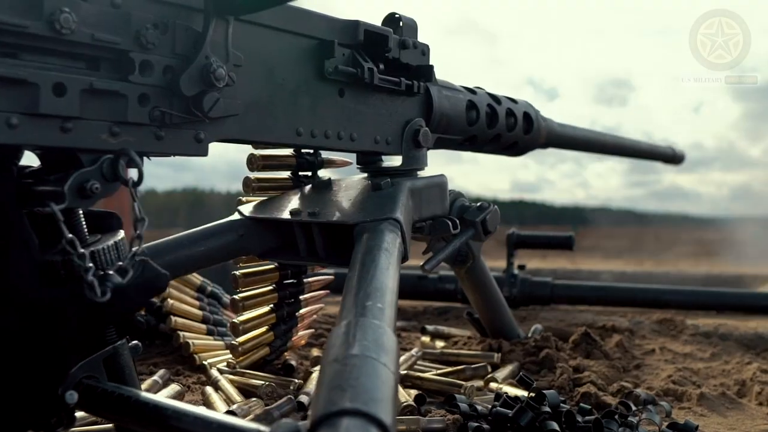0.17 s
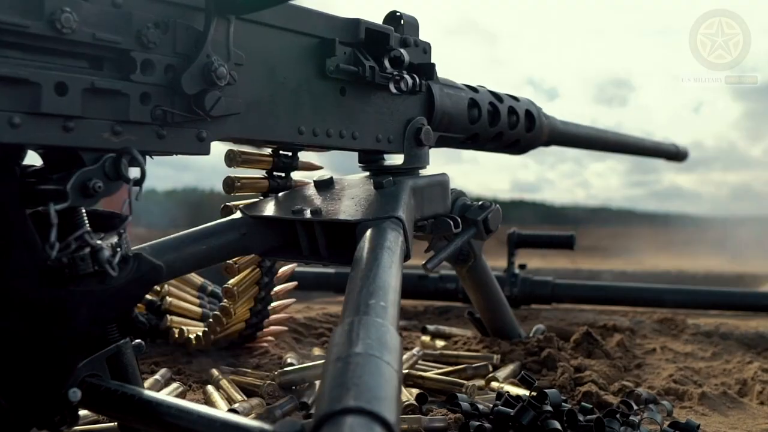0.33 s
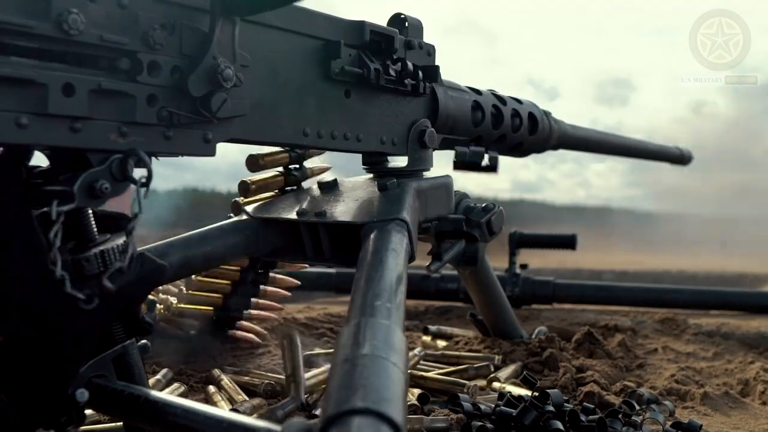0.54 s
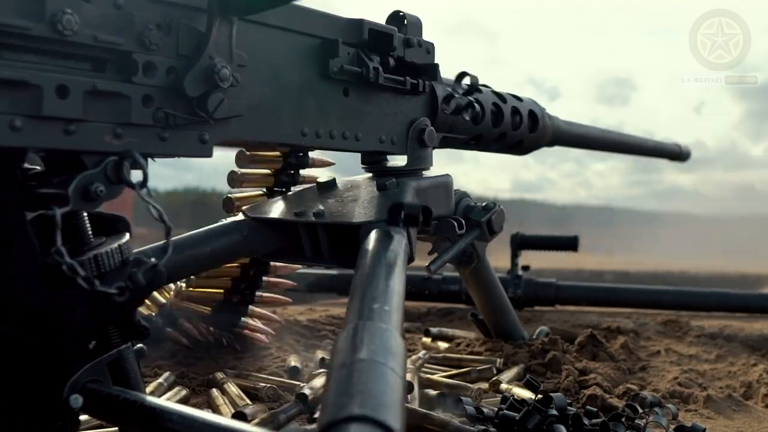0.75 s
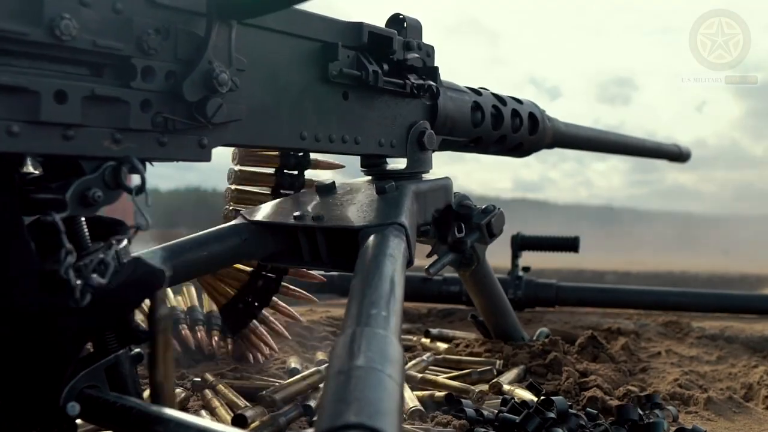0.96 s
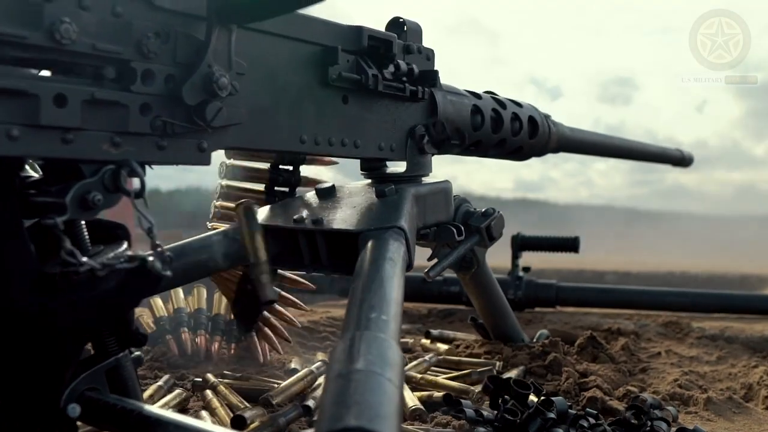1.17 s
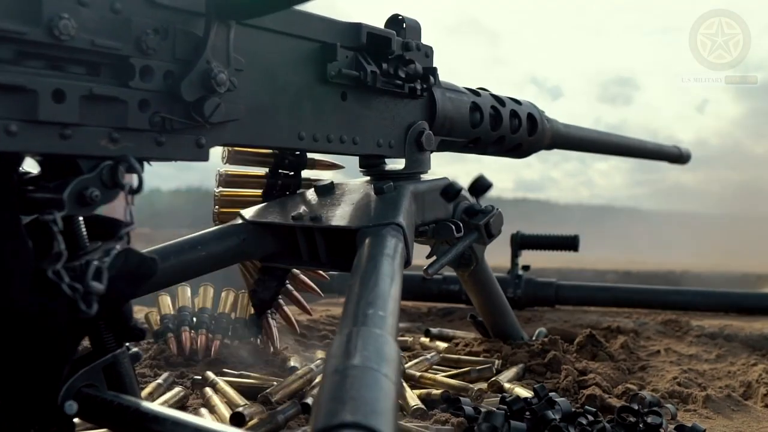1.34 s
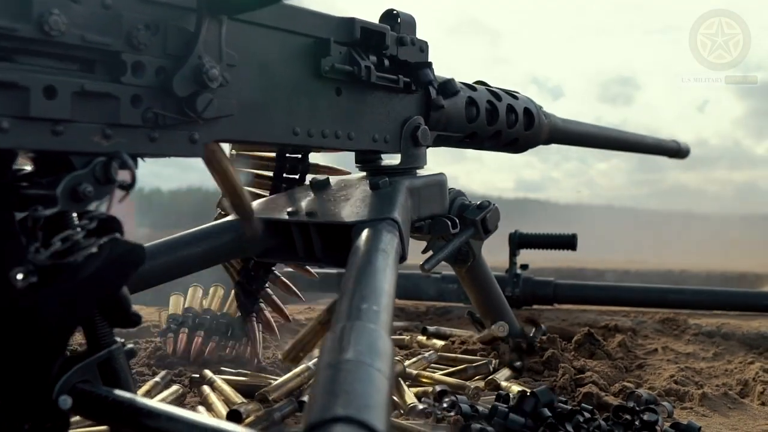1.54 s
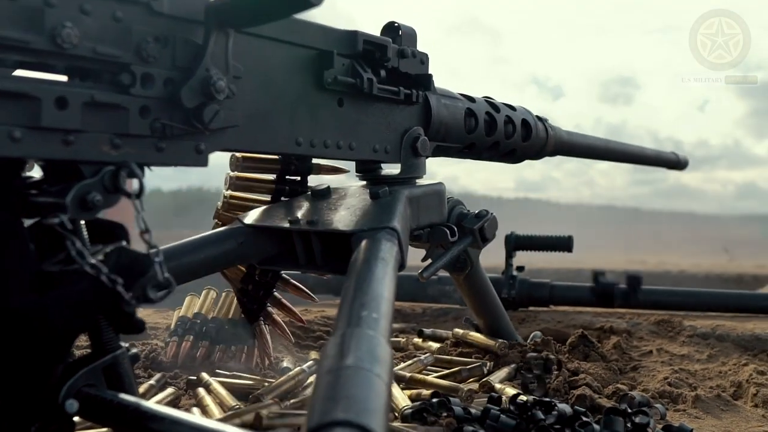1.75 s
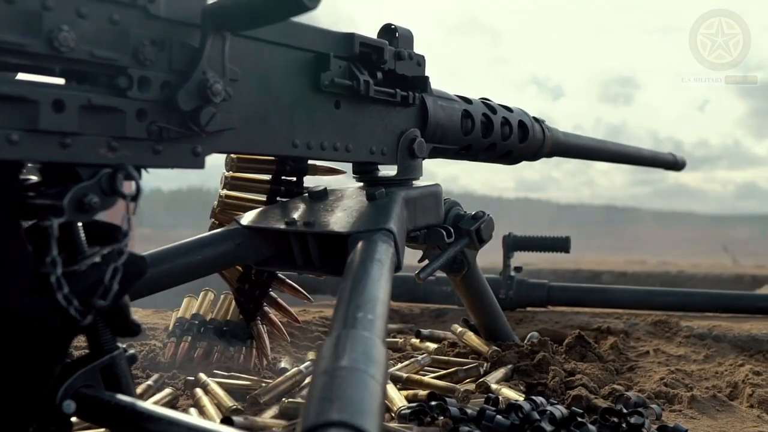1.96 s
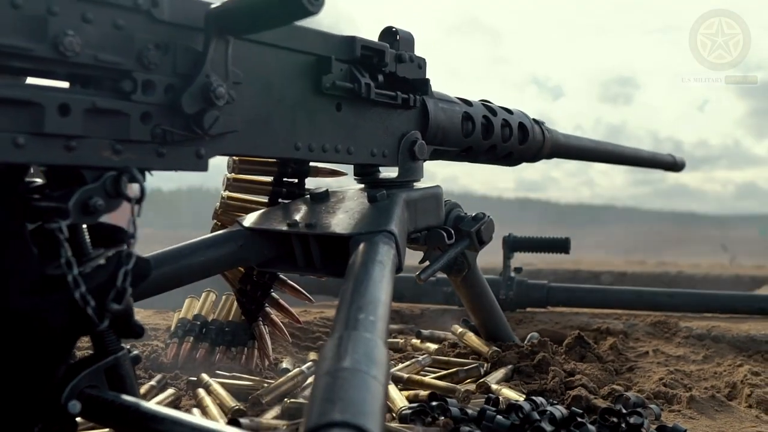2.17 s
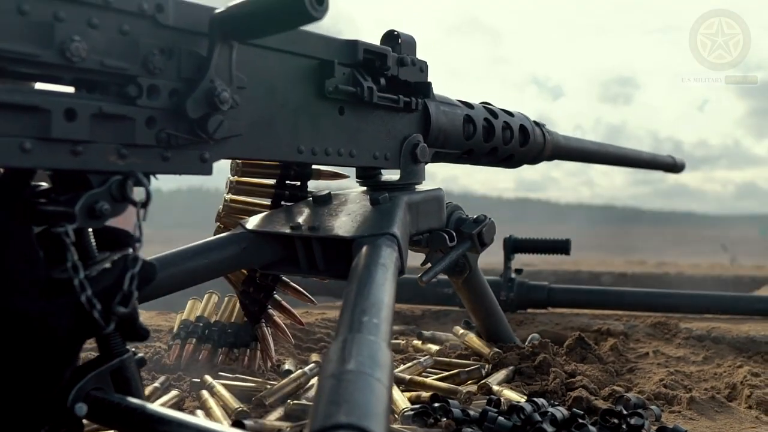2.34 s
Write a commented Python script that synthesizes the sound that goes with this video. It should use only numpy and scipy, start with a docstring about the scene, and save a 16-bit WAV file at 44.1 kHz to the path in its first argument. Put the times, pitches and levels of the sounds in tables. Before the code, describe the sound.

A heavy machine gun, close to the microphone outdoors, hammers out a single steady burst with clanking metal and clinking cases. The firing stops with an empty clack, jingling links and a sharp knock, and the echo dies away.

```python
"""A heavy machine gun on a tripod fires eleven rounds, close by, on an open range. Dull bumps on the gun come
first. Each cycle: the bolt slams shut, the blast tears and falls in pitch, a heavy thud follows and the mount
rings, the bolt hits its buffer and drags the belt on. Cases ring on the pile. The bolt shuts on an empty
chamber, links drop, a sharp knock sounds and the brass settles while the range echo dies away."""
import sys
import numpy as np
from scipy import signal
from scipy.fft import rfft, irfft
from scipy.io import wavfile
from scipy.ndimage import uniform_filter1d

SR = 44100
rng = np.random.default_rng(int(sys.argv[2]) if len(sys.argv) > 2 else 0)


def persist_wave(psi):
    """Save psi, clipped to +-1, as 16-bit WAV."""
    counts = np.round(np.clip(psi, -1, 1) * 32767).astype(np.int16)
    wavfile.write(sys.argv[1], SR, np.atleast_2d(counts).T)


N = 105840

# Firing cycles (bolt shut time [s], slam [dB], blast [dB], thud [dB], clack delay [s], rattle [dB])
ROUNDS = [(0.229, 1.5, 1, 2.5, 0.094, 1.5), (0.3583, 0.5, 0.5, 2, 0.092, 2), (0.4851, 1, 0.5, 2, .098, 1),
          (.615, -1.5, 0.5, 1, .099, 2.5), (0.7494, -3.5, 1, 0.5, 0.091, 1.5),
          (0.883, -0.5, -0.5, 0.5, 0.098, 1), (1.0132, 1.5, -1, -0.5, 0.095, 0.5),
          (1.1426, 2, -1.5, -0.5, .0974, 1), (1.2701, 1, -0.5, 0, .0952, 0.5),
          (1.3955, 1, -0.5, -0.5, 0.11, 2), (1.543, 2, -1, -1, 0.094, -0.5)]
# Impacts (time [s], relative level [dB])
SOFT_KNOCKS = [(.001, -36.5), (.015, -33), (.118, -37.5), (.156, -44.5), (.214, -37)]
BRASS_TICKS = [(.057, -50), (.157, -49), (2.01, -45), (2.0723, -36), (2.095, -47), (2.218, -57),
               (2.274, -52.5), (2.32, -62)]
CASE_LANDINGS = [(.3, -7), (.425, -7), (.475, 4), (.552, 2.5), (.68, 3.5), (.72, -1), (.845, -1.5),
                 (.962, 3.5), (1.084, -2), (1.212, 2.5), (1.245, 0.5), (1.342, 3.5), (1.478, 1),
                 (1.605, -7), (1.648, -1), (1.708, -3.5), (1.748, -8.5), (1.788, -4.5)]
LINK_LANDINGS = [(1.69, 1.5), (1.785, 2), (1.86, -3), (1.921, -1), (1.943, -5)]
HARD_KNOCKS = [(1.8228, -18.5), (1.918, -36)]
# Noise spectra (frequency [Hz], relative density [dB])
AIR_SPECTRUM = [(30, -40), (70, -19), (120, -7.5), (220, -8.5), (320, -12.5), (630, -13), (1300, -3),
                (2300, -6.5), (3300, -19), (5500, -15.5), (9000, -29), (15000, -34)]
SOFT_KNOCK_SPECTRUM = [(30, -23), (140, 1), (300, -10.5), (700, -16.5), (1400, -11.5), (3000, -21.5),
                       (8000, -36.5), (15000, -53)]
TICK_SPECTRUM = [(200, -25), (2000, -2), (4000, -6.5), (6300, 6), (8500, -10.5), (10000, -9), (15000, -25)]
SLAM_SPECTRUM = [(60, -69), (300, -30), (700, -11), (1400, 3), (2400, -4), (4200, 0.5), (7000, -8.5),
                 (15000, -10)]
ECHO_SPECTRUM = [(40, -34), (150, -7), (300, -5), (600, -10), (1400, -3), (2400, -0.5), (3300, -6),
                 (6000, -8), (9000, -25), (15000, -30)]
BLAST_SPECTRUM = [(60, -30), (200, -20.5), (500, -5), (1200, -1), (2500, -0.5), (5000, -2), (8000, -3),
                  (15000, -5.5)]
THUD_SPECTRUM = [(40, -12), (90, -23), (140, -25), (350, 1.5), (700, -1), (1400, 1.5), (2200, -2.5),
                 (3200, -7.5), (6000, -2.5), (15000, -17)]
WASH_SPECTRUM = [(60, -25), (200, -6), (500, -4), (1400, 0), (2600, -1), (5000, -1), (8000, -5.5),
                 (15000, -11)]
BUFFER_SPECTRUM = [(60, -35), (130, -24), (250, -1), (700, -6.5), (1500, 0.5), (2800, -2.5), (5000, -7),
                   (15000, -30)]
RATTLE_SPECTRUM = [(60, -58), (400, -27.5), (800, -11.5), (1300, -2), (2500, 1), (4300, 1), (6000, 2.5),
                   (8000, -4.5), (15000, -5.5)]
HARD_KNOCK_SPECTRUM = [(40, -33), (100, -18), (230, 1.5), (600, -5.5), (1400, -3.5), (3000, -8),
                       (5500, -8.5), (8000, -16.5), (15000, -19)]
# Left-right likeness of noise (frequency [Hz], coherence [0-1])
COHERENCE = [(100, 0.99), (350, 1), (700, 0.64), (1400, 0.37), (4000, 0.18), (8000, 0), (15000, 0.06)]
# Modes of receiver and tripod, case, feed, link (frequency [Hz], relative level [dB], t60 [s])
MOUNT_MODES = [(113, -15.5, 0.33), (140.2, -5, .34), (230.5, 0.5, 0.27), (267, -3, .24), (358.3, 4, 0.15),
               (394, -7.5, 0.26), (501.3, -1, 0.17), (532, -3, .12), (642, 2, 0.1), (727.5, -2, 0.17),
               (948, -2.5, 0.19), (1039, -1, 0.14), (1269, -3, 0.089), (1353, 5, 0.071)]
CASE_MODES = [(4670, -9.5, 0.24), (6150, -10, 0.083), (6090, -9, 0.094), (6220, 0.5, 0.21), (6240, -3, .14),
              (6400, -5, 0.17), (8520, -9, 0.23), (9800, -13.5, .16), (11100, -11.5, 0.16),
              (14090, -14, 0.18)]
FEED_MODES = [(1786, -4.5, 0.17), (3520, -11, 0.18), (4110, 2, 0.15), (4260, -12.5, .1), (4570, -6, 0.21)]
LINK_MODES = [(6330, 0, 0.34), (7100, -12, 0.23), (7900, -8.5, 0.18), (8700, -8, 0.29), (9950, -0.5, .38),
              (9910, 2.5, 0.32), (10800, -5, .6), (11100, 0, .5), (11650, -3, .3), (11755, 2, .25),
              (12242, -3, 0.97), (12538, 0.5, .55), (12835, -2, .38), (14090, -4, .25), (14870, 4, 0.27),
              (14970, -3, 0.19)]

SHUT_S, SLAM_DB, BLAST_DB, THUD_DB, CLACK_DELAY_S, RATTLE_DB = np.transpose(ROUNDS)
CLACK_S = SHUT_S + CLACK_DELAY_S
PAWL_S = CLACK_S + 0.016
EMPTY_S, EMPTY_DB = 1.674, -2  # bolt shuts on an empty chamber
EVENT_T_S, SCENE_T_S = np.arange(12288) / SR, np.arange(N) / SR


def amp(db):
    """Decibels to gain."""
    return 10 ** (np.asarray(db) / 20)


def unit_rms(x):
    """Scales to unit rms."""
    return x / np.sqrt(np.mean(x ** 2) + 1e-20)


def lookup(points, hz):
    """Interpolates on a log-frequency axis."""
    points_hz, values = np.transpose(points)
    return np.interp(np.log(hz + 1), np.log(points_hz), values)


def pan(db):
    """Gains for a left-minus-right level."""
    return amp(np.array([[db], [-db]]) / 2)


def add(mix, start_s, sound):
    """Mixes a sound in at start_s."""
    part = mix[:, max(round(start_s * SR), 0):][:, :sound.shape[1]]
    part += sound[:, :part.shape[1]]


def low_cut(x, hz):
    """Removes rumble below hz."""
    return signal.sosfilt(signal.butter(3, hz, "high", fs=SR, output="sos"), x)


def wander(shape, samples):
    """Smoothed random curves of unit rms."""
    return unit_rms(uniform_filter1d(rng.standard_normal(shape), size=samples))


def noise(spectrum, grain_db=0, mono=1, size=len(EVENT_T_S)):
    """Coloured stereo noise in 1 ms grains; higher mono narrows it."""
    hz = np.fft.rfftfreq(size, 1 / SR)
    left, other = rfft(rng.standard_normal((2, size)) * amp(grain_db * wander(size, 44)))
    coherence = np.clip(lookup(COHERENCE, hz), 1e-4, 1) ** (1 / mono)
    right = coherence * left + np.sqrt(1 - coherence ** 2) * other
    return unit_rms(irfft(np.array([left, right]) * amp(lookup(spectrum, hz)), size))


def envelope(attack_s, hold_s, t60_s):
    """Linear rise, hold, exponential decay."""
    decay_s = np.maximum(EVENT_T_S - attack_s - hold_s, 0)
    return np.minimum(EVENT_T_S / attack_s, 1) * amp(-60 * decay_s / t60_s)


def bursts(times_s, levels_db, spectrum, shape, alike=0, grain_db=0, mono=1):
    """One noise burst per event; alike is the power share common to all."""
    out, common = np.zeros((2, N)), noise(spectrum, grain_db, mono)
    for start_s, db in zip(times_s, levels_db):
        fresh = noise(spectrum, grain_db, mono)
        add(out, start_s, amp(db) * shape * (np.sqrt(alike) * common + np.sqrt(1 - alike) * fresh))
    return out


def rings(times_s, levels_db, modes, attack_s, spread_rad, detune, vary_db, flutter=0):
    """Struck modes; spread_rad scatters left-right phase, flutter is the wobble of tumbling."""
    out, t = np.zeros((2, N)), np.arange(SR * 2 // 3) / SR
    hz, mode_db, t60_s = np.transpose(modes)[:, :, None]
    decay = amp(mode_db - 60 * t / t60_s) * np.minimum(t / attack_s, 1)
    start_rad = rng.uniform(0, 2 * np.pi, hz.shape)
    for start_s, db in zip(times_s, levels_db):
        left, right, tuning, strength = rng.standard_normal((4, len(hz), 1))
        phase_rad = 2 * np.pi * hz * (1 + detune * tuning) * t + start_rad
        gains = amp(db + vary_db * strength) * decay
        ring = np.array([(gains * np.sin(phase_rad + spread_rad * side)).sum(0) for side in (left, right)])
        add(out, start_s, ring * (1 + flutter * wander((2, len(t)), 260)))
    return out


def swoops(times_s, levels_db, shape, from_hz, to_hz, fall_s, rough):
    """Rough pressure waves of quickly sinking pitch."""
    out = np.zeros((2, N))
    hz = to_hz + (from_hz - to_hz) * np.exp(-EVENT_T_S / fall_s)
    for start_s, db in zip(times_s, levels_db):
        wobble, flutter = wander((2, len(hz)), 50)
        phase_rad = 2 * np.pi * np.cumsum(hz * (1 + rough * wobble)) / SR
        wave = shape * np.sin(phase_rad) * (1 + rough * flutter)
        add(out, start_s, amp(db) * np.array([wave, wave]))
    return out


def range_air():
    """Faint, slowly fading wash of the range."""
    return noise(AIR_SPECTRUM, grain_db=1, size=N) * amp(np.linspace(-48, -54, N))


def soft_knocks():
    """Dull bumps on the gun before it fires."""
    return bursts(*np.transpose(SOFT_KNOCKS), SOFT_KNOCK_SPECTRUM, envelope(0.00072, 0.0046, 0.06),
                  grain_db=4)


def brass_ticks():
    """Brass ticks as it settles."""
    return bursts(*np.transpose(BRASS_TICKS), TICK_SPECTRUM, envelope(0.0004, 0.0013, 0.045), grain_db=7)


def bolt_slam():
    """The bolt shuts on each round, then on the empty chamber."""
    return bursts(np.append(SHUT_S, EMPTY_S), np.append(SLAM_DB, EMPTY_DB) - 17, SLAM_SPECTRUM,
                  envelope(0.00067, 0.0013, 0.049), alike=0.067, grain_db=2, mono=1.6)


def steel_ring(x, ring_db=-10, t60_s=0.13, count=110):
    """Adds the short, high modes of the steel parts."""
    hz = np.geomspace(1500, 14500, count)[:, None] * rng.uniform(0.97, 1.03, (count, 1))
    t = EVENT_T_S[:len(EVENT_T_S) // 2]
    weights = rng.standard_normal((2, count)) + rng.standard_normal(count)
    response = weights @ (np.sin(2 * np.pi * hz * t) * np.sqrt(hz)) * amp(-60 * t / t60_s)
    response /= np.linalg.norm(response[0])
    return x + amp(ring_db) * signal.oaconvolve(x, response, axes=1)[:, :N]


def range_echo(x, t60_s=1.66, echo_db=-22, build_s=0.02):
    """Sound scattered back from ground, banks and tree line."""
    shape = amp(-60 * SCENE_T_S / t60_s) * np.minimum(SCENE_T_S / build_s, 1)
    tail = noise(ECHO_SPECTRUM, grain_db=6, size=N) * shape
    return amp(echo_db) * signal.fftconvolve(x, tail / np.linalg.norm(tail[0]), axes=1)[:, :N]


def muzzle_blast():
    """Tearing blast, its falling note and its slap off the ground."""
    tear = bursts(SHUT_S + 0.0065, BLAST_DB - 18, BLAST_SPECTRUM, envelope(0.0007, 0.01, 0.062),
                  alike=0.079, mono=0.14)
    fall = swoops(SHUT_S + 0.013, BLAST_DB - 34.5, envelope(0.0037, 0.012, 0.075),
                  from_hz=800, to_hz=246.5, fall_s=0.00911, rough=0.3)
    slap = swoops(SHUT_S + 0.0203, BLAST_DB - 19.5, envelope(0.0013, 0.0008, 0.02),
                  from_hz=1200, to_hz=810, fall_s=0.0072, rough=0.27)
    return tear * pan(-1.9) + fall + slap


def treble_dip(x, above_hz=1300, delay_s=0.0284, half_width_s=0.0052, dip_db=-4.5):
    """The treble dips briefly after each blast."""
    dip = sum(np.exp(-((SCENE_T_S - shut_s - delay_s) / half_width_s) ** 4) for shut_s in SHUT_S)
    low = signal.sosfiltfilt(signal.butter(2, above_hz, fs=SR, output="sos"), x)
    return low + (x - low) * amp(dip_db * dip)


def thud_and_ring():
    """A bump, then a thud with a noisy wash; receiver and tripod ring."""
    thud_s = SHUT_S + 0.0372
    bump = swoops(SHUT_S + 0.0338, THUD_DB - 28.5, envelope(0.00025, 0.0012, 0.0095),
                  from_hz=736, to_hz=450, fall_s=0.0032, rough=0.21)
    thud = bursts(thud_s, THUD_DB - 26, THUD_SPECTRUM, envelope(0.00033, 0.0058, 0.097),
                  alike=0.63, grain_db=0.5, mono=0.48)
    wash = bursts(thud_s, THUD_DB - 29.5, WASH_SPECTRUM, envelope(0.0007, 0.055, 0.26),
                  alike=0.069, grain_db=2, mono=0.72)
    ring = rings(thud_s, THUD_DB - 36, MOUNT_MODES,
                 attack_s=0.0014, spread_rad=0.064, detune=0.005, vary_db=0.5)
    return bump + thud * pan(-6.5) + wash * pan(-0.55) + ring * pan(0.14)


def spent_cases():
    """Tumbling cases ring on the pile."""
    times_s, levels_db = np.transpose(CASE_LANDINGS)
    return rings(times_s, levels_db - 29, CASE_MODES,
                 attack_s=0.0042, spread_rad=0.8, detune=0.002, vary_db=2.5, flutter=0.45)


def buffer_hit():
    """The bolt flies back into its buffer."""
    return bursts(SHUT_S + 0.0885, RATTLE_DB - 25.5, BUFFER_SPECTRUM, envelope(0.00087, 0.0019, 0.0094),
                  alike=0.74, grain_db=1.5, mono=0.4)


def belt_rattle():
    """The belt clacks and rattles as the pawl drags it on."""
    clack = bursts(CLACK_S, RATTLE_DB - 20.5, RATTLE_SPECTRUM, envelope(0.00074, 0.00099, 0.028),
                   alike=0.14, grain_db=2.5)
    pawl = bursts(PAWL_S, RATTLE_DB - 26, RATTLE_SPECTRUM, envelope(0.0045, 0.003, 0.053), grain_db=4)
    belt = bursts(CLACK_S, RATTLE_DB - 27, RATTLE_SPECTRUM, envelope(0.008, 0.028, 0.091),
                  alike=0.11, grain_db=3, mono=2.9)
    return (clack + pawl) * pan(2.7) + belt * pan(0.6)


def feed_ring():
    """The feed rings at each pawl stroke and at the empty slam."""
    return rings(np.append(PAWL_S, EMPTY_S), np.append(RATTLE_DB, EMPTY_DB) - 31, FEED_MODES,
                 attack_s=0.002, spread_rad=0.64, detune=0.005, vary_db=4, flutter=0.37)


def belt_links():
    """Links ring and scrape on the pile."""
    times_s, levels_db = np.transpose(LINK_LANDINGS)
    ring = rings(times_s, levels_db - 43.5, LINK_MODES,
                 attack_s=0.0025, spread_rad=1.68, detune=0.0005, vary_db=2, flutter=0.12)
    scrape = bursts(times_s, levels_db - 44, spectrum=[(500, -33), (3000, -13), (7000, 7), (15000, -5)],
                    shape=envelope(0.002, 0.016, 0.27), grain_db=4)
    return ring + scrape


def hard_knocks():
    """A sharp blow nearby, then a faint one."""
    shape = envelope(0.0002, 0.00045, 0.012) + amp(-17.5) * envelope(0.0039, 0.0016, 0.19)
    return low_cut(bursts(*np.transpose(HARD_KNOCKS), HARD_KNOCK_SPECTRUM, shape, grain_db=1), hz=139)


def scene():
    """Gun, pile and knocks over the range; only the gun echoes."""
    shots = muzzle_blast() + thud_and_ring()
    action = steel_ring(bolt_slam() * pan(1.6) + belt_rattle()) + buffer_hit() * pan(-6.5) + feed_ring()
    gun = low_cut(shots + action, hz=91)
    pile = brass_ticks() * pan(-5.5) + spent_cases() * pan(-1.8) + belt_links() * pan(-4.5)
    knocks = soft_knocks() + hard_knocks() * pan(-4.5)
    return treble_dip(gun + pile) + knocks + (range_air() + range_echo(gun)) * pan(-2.3)


def record(dry, ceiling=0.72, cutoff_hz=15300):
    """Soft overload, then low-pass."""
    low_pass = signal.firwin(255, cutoff_hz, window=("kaiser", 9), fs=SR)
    return signal.oaconvolve(ceiling * np.tanh(dry / ceiling), low_pass[None], "same")


dry = scene()
out = record(dry)
persist_wave(out)
```